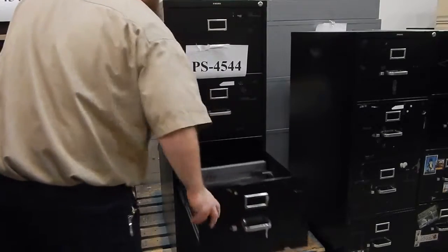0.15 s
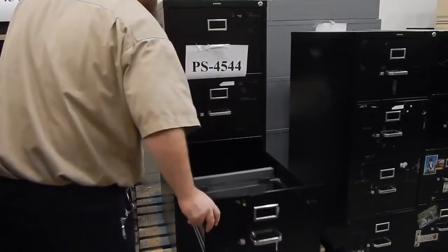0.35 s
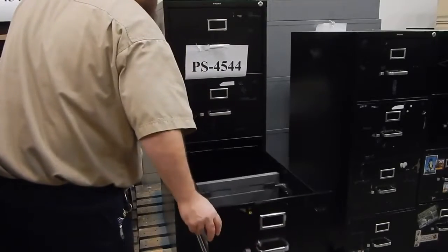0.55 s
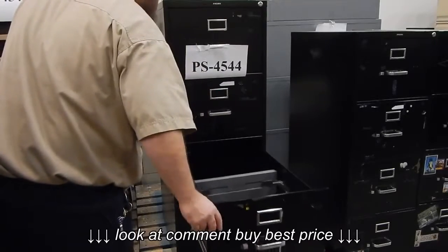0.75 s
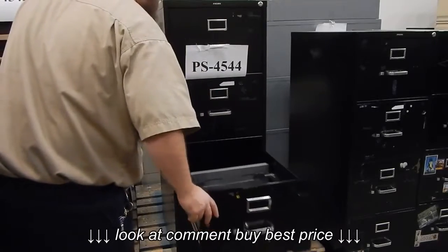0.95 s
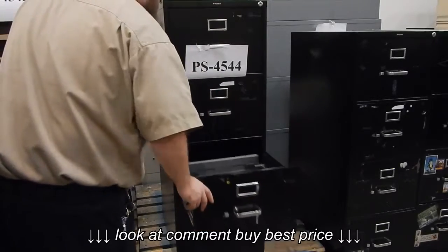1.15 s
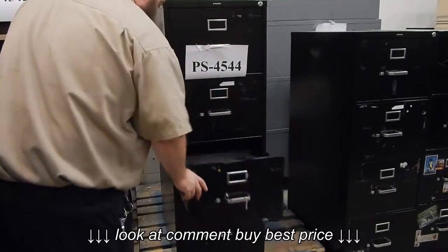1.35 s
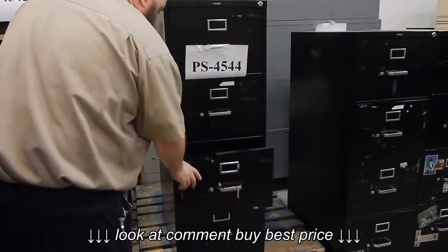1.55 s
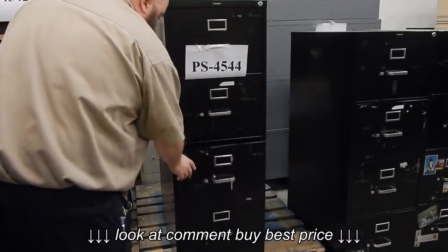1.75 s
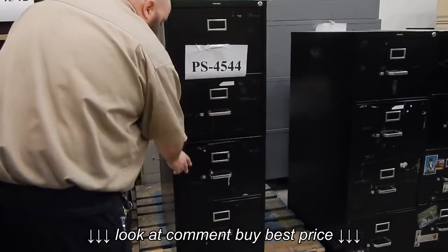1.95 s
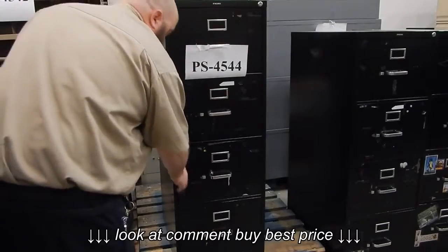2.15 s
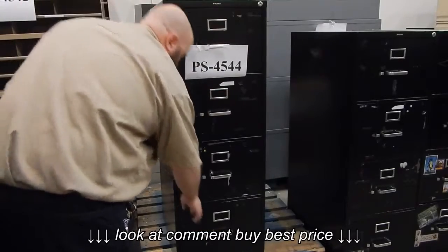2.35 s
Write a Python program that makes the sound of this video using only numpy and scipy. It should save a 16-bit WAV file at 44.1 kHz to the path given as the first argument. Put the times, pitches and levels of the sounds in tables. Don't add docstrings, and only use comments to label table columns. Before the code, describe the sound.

A steel filing cabinet drawer clacks open, rattles, then rolls shut with a loud metallic bang

```python
import sys
import numpy as np
from scipy import signal
from scipy.fft import rfft, irfft
from scipy.io import wavfile
from scipy.ndimage import uniform_filter1d, minimum_filter1d, map_coordinates

SR = 44100
rng = np.random.default_rng(int(sys.argv[2]) if len(sys.argv) > 2 else 0)


def pcm_store(signal):
    levels = np.round(np.clip(np.atleast_2d(signal), -1, 1) * 32767)
    wavfile.write(sys.argv[1], SR, levels.astype(np.int16).T)


def natural_amplitude(level_db):
    exponent = np.asarray(level_db, float) / 20
    return 10 ** exponent


N = 110250

# box_db, panels_db, handle_db
MODES_OVER_NOISE_DB = [-8, -11.5, -0.5]
# box_db, panels_db, treble_db, handle_db
PART_DB = [-4, -5, -3.5, -10]
# freq_hz, level_db
MIC_COLOUR = [(30, -2.5), (2000, 0.5), (6300, -3), (7200, -9), (9500, -18.5), (10500, -31), (13000, -38),
              (16000, -49)]
RING_ROOM_DB = -7.5


def on_log(table, hz):
    table = np.array(table, float)
    log_hz = np.log(np.maximum(table[:, 0], 1))
    return np.interp(np.log(np.maximum(hz, 1)), log_hz, table[:, 1])


def colour(x, db_of_hz):
    hz = np.fft.rfftfreq(x.shape[-1], 1 / SR)
    return irfft(rfft(x) * natural_amplitude(db_of_hz(hz)), x.shape[-1])


def band(x, lo_hz, hi_hz):
    sos = signal.butter(2, [lo_hz, min(hi_hz, .45 * SR)], "band", fs=SR, output="sos")
    return signal.sosfilt(sos, x)


def octave(x, hz):
    return band(x, hz / np.sqrt(2), hz * np.sqrt(2))


def unit(x):
    return x / np.sqrt(np.sum(x ** 2))


def ring(modes):
    t = np.arange(SR) / SR
    out = np.zeros(SR)
    for k, (hz, db, t60_s) in enumerate(modes):
        out += (-1) ** k * natural_amplitude(db - 60 * t / max(t60_s, .01)) * np.sin(2 * np.pi * hz * t)
    return unit(out)


def walk(rate_hz):
    k = int(SR / rate_hz)
    steps = np.repeat(rng.standard_normal(N // k + 1), k)
    w = uniform_filter1d(uniform_filter1d(steps, k), k)[:N]
    return w / w.std()


def grit():
    scatter_db = 2.5
    g = rng.standard_normal(N) * natural_amplitude(scatter_db * rng.exponential(size=N))
    return g / g.std()


def swell(t, start_s, length_s):
    attack_s = 0.0025
    u = np.maximum(t - start_s, 0)
    return (1 - np.exp(-(u / attack_s) ** 2)) * np.exp(-(u / max(length_s, .002)) ** 2)


def body(force, modes, lo_hz, hi_hz, ring_db):
    direct = band(force, lo_hz, hi_hz) * np.sqrt(SR / 2 / (hi_hz - lo_hz))
    return direct + natural_amplitude(ring_db) * signal.fftconvolve(force, ring(modes))[:N]


def ventilation():
    # freq_hz, density_db
    air = [(40, -3.5), (160, 3), (420, -1.5), (600, -6.5), (2100, -19.5), (5000, -24.5), (8000, -28),
           (16000, -97)]
    level_db = -41
    out = np.zeros(N)
    for hz in 30 * 2. ** np.arange(10):
        out += octave(rng.standard_normal(N), hz) * natural_amplitude(1.7 * walk(4.53))
    out = colour(out, lambda hz: on_log(air, hz) - on_log(MIC_COLOUR, hz))
    return natural_amplitude(level_db) * out / band(out, 120, 3400).std()


def room():
    # freq_hz, t60_s
    tail_t60 = [(60, 6.5), (250, 0.5), (1000, 1.29), (4000, 1.5), (10000, 0.8)]
    # freq_hz, tail_db
    tail_level = [(60, -5.5), (250, 5), (1000, -6), (4000, -7), (10000, -18)]
    early_db, early_t60_s, tail_rise_s = -2.5, 0.2, 0.0091
    t = np.arange(int(1.2 * SR)) / SR
    out = natural_amplitude(early_db) * unit(rng.standard_normal(len(t)) * natural_amplitude(-60 * t / early_t60_s))
    for hz in 30 * 2. ** np.arange(10):
        tail = octave(rng.standard_normal(len(t)), hz) * natural_amplitude(-60 * t / on_log(tail_t60, hz))
        tail = unit(tail * (1 - np.exp(-t / tail_rise_s)))
        out = out + natural_amplitude(on_log(tail_level, hz)) * tail * np.sqrt(hz * np.sqrt(2) / SR)
    return out


def sway(x):
    shift_s, rate_hz = 0.0001516, 30
    return map_coordinates(x, [np.arange(N) + shift_s * SR * walk(rate_hz)], mode="mirror")


def rumble(t):
    start_s, end_s, fade_s, level_db = 0.33, 0.95, .02, -48
    fade_in = 1 / (1 + np.exp((start_s - t) / fade_s))
    fade_out = 1 / (1 + np.exp((t - end_s) / fade_s))
    shake = band(band(rng.standard_normal(N), 63, 94.0), 65, 99.0)
    return natural_amplitude(level_db) * fade_in * fade_out * shake / shake.std()


def cabinet(t):
    # start_s, level_db, push_s
    shoves = [
        (0.236, -35, 0.0047),
        (0.616, -35.5, 0.0053),
        (1.701, -35, 0.0059),
        (1.844, -26.5, 0.0036),
        (1.935, -19.5, 0.004),
        (1.979, -24.5, 0.0048),
        (2.045, -21.5, 0.0048),
    ]
    # freq_hz, level_db, t60_s
    frame = [(42.7, -11, .7), (81, 4, 0.5), (100.6, -1, 0.44), (113, -5.5, 0.31), (126.6, -6.5, .55),
             (150, 1.5, .55), (162.8, 7.5, 0.37), (190, 5.5, 0.65), (207, -4, 0.89), (234, 1, 0.37),
             (272.6, 11, 0.3), (323, 15.5, 0.21)]
    share = rng.standard_normal((len(shoves), len(frame)))
    pushes = np.array([natural_amplitude(db) * np.exp(-.5 * ((t - s - w) / (w / 4)) ** 2) * (0.0048 / w)
                       for s, db, w in shoves])
    boom = np.zeros(N)
    for k, mode in enumerate(frame):
        force = (np.sign(share[:, k]) * natural_amplitude(1.8 * share[:, k])) @ pushes
        boom += signal.fftconvolve(force, natural_amplitude(mode[1]) * ring([mode]))[:N]
    return 0.098 * band(band(boom, 29, 420), 29, 420) + rumble(t)


def pops(t):
    # centre_s, level_db, pitch_hz
    swings = [(1.953, -11, 142), (1.983, -15, 140), (2.02, -24.5, 132), (2.047, -11, 150),
              (2.068, -13, 170), (2.097, -19, 178), (2.132, -15.5, 197), (2.149, -14, 150),
              (2.171, -20, 190), (2.228, -15.5, 108), (2.284, -18.5, 140.3), (2.31, -20.5, 150)]
    width_cycles = 0.38
    out = np.zeros(N)
    for s, db, hz in swings:
        bell = np.exp(-.5 * ((t - s) * hz / width_cycles) ** 2)
        out += natural_amplitude(db) * bell * np.cos(2 * np.pi * hz * (t - s))
    return out


def pings(t):
    # start_s, level_db, pitch_hz, t60_s
    struck = [(.217, -8.5, 1400, 0.048), (.219, -20.5, 2080, 0.056), (.221, -17, 765, .04),
              (.229, -12.5, 363, 0.15), (.238, -15, 663, .09), (.241, -15, 1270, .06),
              (.278, -20, 252.2, 0.32), (.611, -20.5, 380, 0.058), (0.614, -23.5, 250, 0.091),
              (.668, -27, 298, 0.11), (1.521, -30, 186, .11), (1.683, -11.5, 440, .045),
              (1.691, -20, 185, .45), (1.699, -16.5, 610.5, 0.11), (1.701, -18, 947, 0.1),
              (1.745, -25, 638, 0.22), (1.752, -25.5, 81, 0.23), (1.751, -25, 126, 0.13),
              (1.8406, -13.5, 1600, 0.045), (1.841, -14, 1650, .03), (1.846, -18, 190, .073),
              (1.921, -16.5, 137, 0.23), (1.931, -16.5, 460, 0.069), (1.941, -30, 44.9, 0.99),
              (1.945, -23, 74.6, 0.69), (1.955, -20.5, 660, 0.19), (1.991, -17.5, 113, .8)]
    rise_s = 0.0013
    out = np.zeros(N)
    for s, db, hz, t60_s in struck:
        first = int(s * SR) + 1
        u = t[first:first + int(2 * t60_s * SR)] - s
        pair = np.sin(2 * np.pi * hz * u) + 0.37 * np.sin(2 * np.pi * hz * 1.04 * u)
        out[first:first + len(u)] += natural_amplitude(db - 60 * u / t60_s) * (1 - np.exp(-u / rise_s)) * pair
    return out


def handle(t):
    # start_s, level_db
    bounces = [
        (0.6981, -6.5),
        (0.7093, -8.5),
        (.722, -17.5),
        (.732, -23),
        (0.7748, -14),
        (0.783, -17.5),
        (.799, -27.5),
        (.808, -30),
        (0.8544, -23),
    ]
    # freq_hz, level_db, t60_s
    modes = [(1335, 1, .05), (1430, 0, .04), (1529, 0, .045), (1690, -4, .04), (1940, -2, .035),
             (2089, -6, .03), (3150, -3, .025), (3380, -4, .03), (3520, -4, .03), (3750, -3, .025),
             (4156, -3, .02), (4506, 3, .025), (4900, -4, .02), (6035, -4, .03)]
    bounce_s = 0.0072
    force = grit() * sum(natural_amplitude(db + PART_DB[3]) * swell(t, s, bounce_s) for s, db in bounces)
    return body(force, modes, 1100, 6500, MODES_OVER_NOISE_DB[2])


def drawer(t):
    # start_s, treble_db, box_re_treble_db, panels_re_treble_db, chatter_s
    knocks = [(0.2119, -20, -12, -6, 0.0092), (0.2152, -3, -9, -11.5, 0.018),
              (.236, -13, -6.5, -4.5, 0.0096), (0.248, -17, -10, 0.5, 0.0099), (.287, -26, 2.5, 2, 0.014),
              (0.609, -25, 3, 1.5, 0.016), (0.622, -27, -9, -3, 0.04), (.853, -39, -17, -6, 0.015),
              (1.14, -40.5, -17, -21, 0.021), (1.364, -42, 4.5, 2.5, 0.017), (1.517, -41, 3.5, -5, 0.036),
              (1.682, -18, 6, -1.5, 0.014), (1.698, -27.5, 8, 2, 0.017), (1.746, -38.5, 19.5, -1, 0.0094),
              (1.7683, -34, 5, -7, 0.011), (1.84, -15.5, 3, -3, 0.012), (1.863, -25.5, 7.5, 3, 0.01),
              (1.891, -16, -13, -12, 0.0092), (1.9018, -17.5, -8, -6.5, 0.013),
              (1.923, -10, -16, -11, 0.01), (1.928, -3.5, -18.5, -16, 0.013),
              (1.938, -8.5, -14, -16, 0.0069), (1.947, -6, -18.5, -12.5, 0.018),
              (1.966, -15, -24, -9.5, 0.0075), (1.979, -14, -15, -3.5, 0.01), (2.013, -23, -13, 0.5, .008),
              (2.032, -25, -12, -1.5, 0.011), (2.066, -24, -14, -11, .012)]
    # time_s, level_db
    rolling = [(0, -43.5), (.12, -45), (.2, -48), (.6, -52), (.9, -47), (1.15, -44), (1.25, -60.5),
               (1.65, -57.5), (1.85, -48), (1.93, -29), (2.0, -31.5), (2.5, -66.5)]
    # box_db, panels_db, treble_db
    rolling_part_db = [-2, -7.5, -1]
    # freq_hz, level_db, t60_s
    box_modes = [(250, -11, 0.52), (287, -0.5, 0.67), (308, -25.5, 0.048), (363, -7, 0.057),
                 (407.5, -6.5, 1), (428, 7.5, 0.19), (487, -9, 0.21), (598, -4, 0.63), (660, -15, 0.13),
                 (679, -9, 0.8)]
    # freq_hz, level_db, t60_s
    panel_modes = [(845, -17, 0.45), (980, 7, 0.055), (1102, -15, 0.094), (1400, 4, 0.19),
                   (1600, -8, 0.033), (1720, 1, 0.36), (1703, -8, 0.079), (1890, -2, 0.53),
                   (1964, 11.5, 0.05), (2140, 14.5, 0.28)]
    roll = natural_amplitude(np.interp(t, *np.array(rolling).T) + 0.51 * walk(25.57))
    force = np.zeros((3, N))
    for start_s, treble_db, box_db, panels_db, chatter_s in knocks:
        chatter = swell(t, start_s, chatter_s)
        for k, part_db in enumerate((box_db, panels_db, 0)):
            force[k] += natural_amplitude(PART_DB[k] + treble_db + part_db) * chatter
    for k in range(3):
        force[k] = (force[k] + natural_amplitude(rolling_part_db[k]) * roll) * grit()
    box = body(force[0], box_modes, 150.0, 728, MODES_OVER_NOISE_DB[0])
    panels = body(force[1], panel_modes, 636, 2230, MODES_OVER_NOISE_DB[1])
    return box + panels + band(force[2], 2290, 26000)


def scene():
    # freq_hz, level_db
    ports_side = [(40, -21), (125, -27.5), (300, -36), (2400, -22.5), (2750, -12.5), (4000, -12),
                  (8000, -10.5), (15000, 2)]
    side_trim_db, air_side_db = 2, 9.5
    shut_from_s, shut_fade_s = 1.2, 0.14
    t = np.arange(N) / SR
    rings = pings(t) + pops(t)
    box = drawer(t) + cabinet(t) + natural_amplitude(RING_ROOM_DB) * rings
    shut = np.clip((t - shut_from_s) / shut_fade_s, 0, 1)
    places = [box * (1 - shut), box * shut, handle(t)]

    def echoes():
        return sway(sum(signal.fftconvolve(x, room())[:N] for x in places))

    mid = sum(places) + (1 - natural_amplitude(RING_ROOM_DB)) * rings + echoes() + ventilation()
    side = np.sqrt(2) * echoes() + natural_amplitude(air_side_db) * ventilation()
    side = colour(side, lambda hz: on_log(ports_side, hz) + side_trim_db)
    return np.array([mid + side, mid - side])


def band_limit(x):
    return signal.sosfilt(signal.butter(12, 15600, fs=SR, output="sos"), x)


def record(dry):
    # freq_hz, width_hz, level_db
    tone_peaks = [(1847, 1180, 4.5), (2487, 207, -10.5), (2660, 390, 1.5), (3634, 676, 8), (4110, 330, -2.5),
                  (6090, 1260, 8), (516, 52, -5.5), (647, 80, 1.5), (57.4, 100, -4)]
    clip_at, hiss_db, limit_s = 6.7, -68.5, .002

    def tone_db(hz):
        return on_log(MIC_COLOUR, hz) + sum(db / (1 + (2 * (hz - f) / w) ** 2) for f, w, db in tone_peaks)

    x = colour(clip_at * np.tanh(dry / clip_at), tone_db)
    x = x + natural_amplitude(hiss_db) * rng.standard_normal(dry.shape)
    k = int(limit_s * SR)
    gain = np.minimum(1, 1 / (np.abs(x).max(axis=0) + 1e-9))
    x = x * uniform_filter1d(minimum_filter1d(gain, k), k)
    return band_limit(x)


dry = scene()
out = record(dry)
pcm_store(out)
```